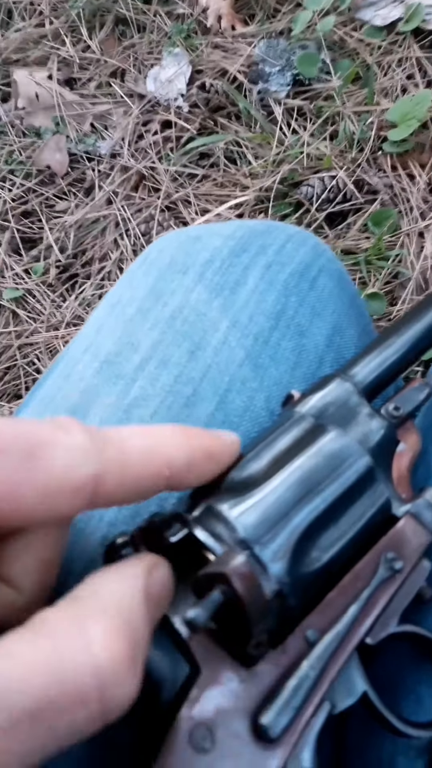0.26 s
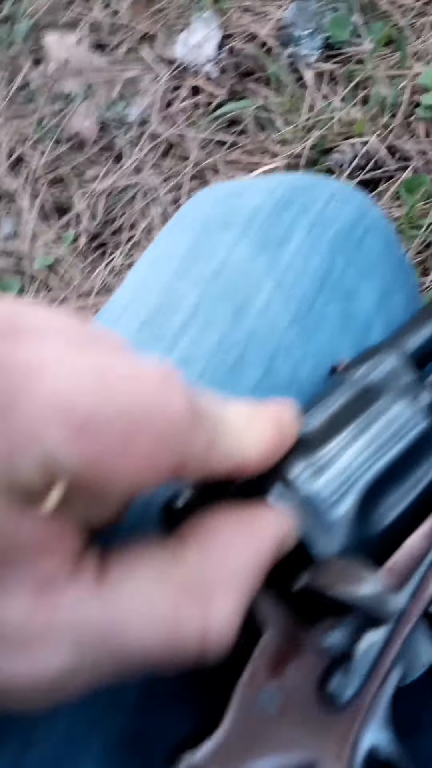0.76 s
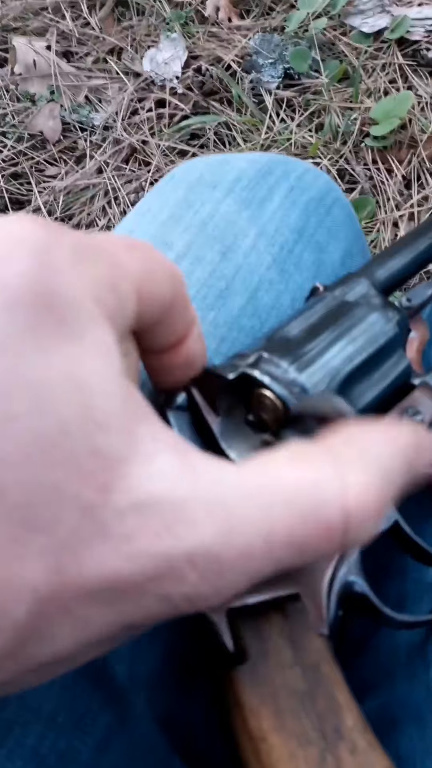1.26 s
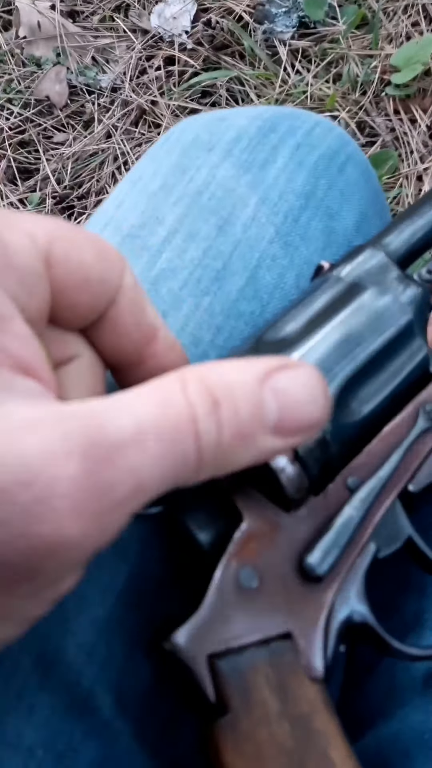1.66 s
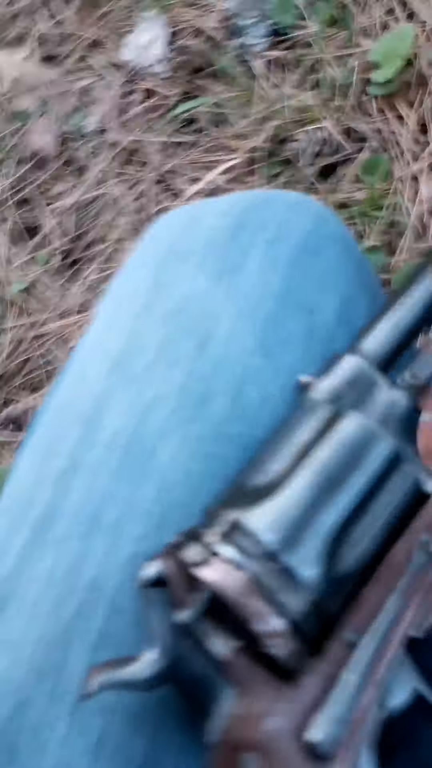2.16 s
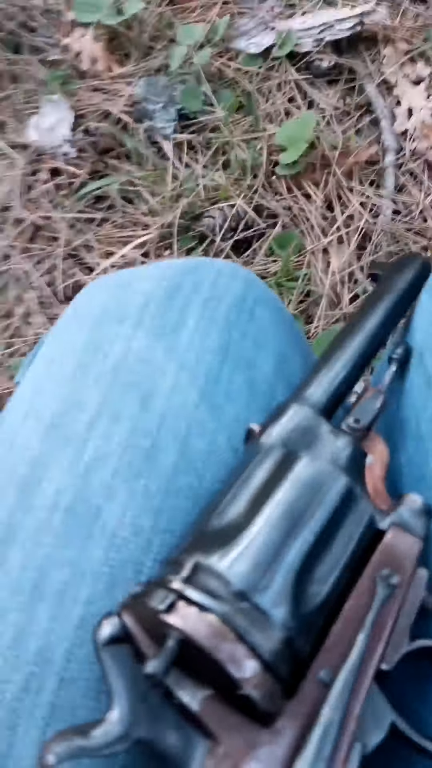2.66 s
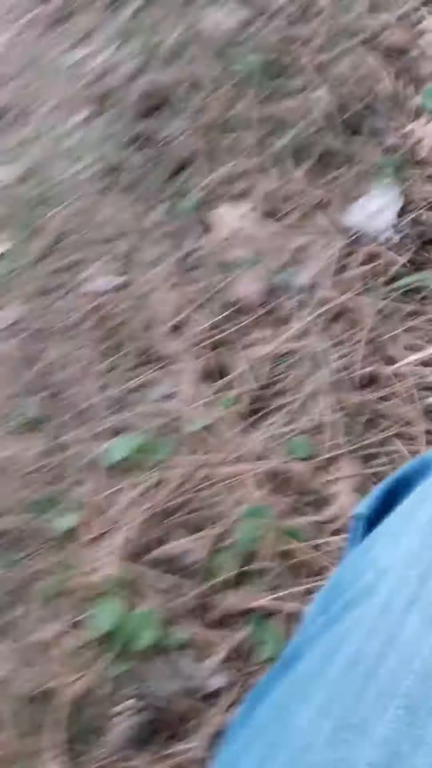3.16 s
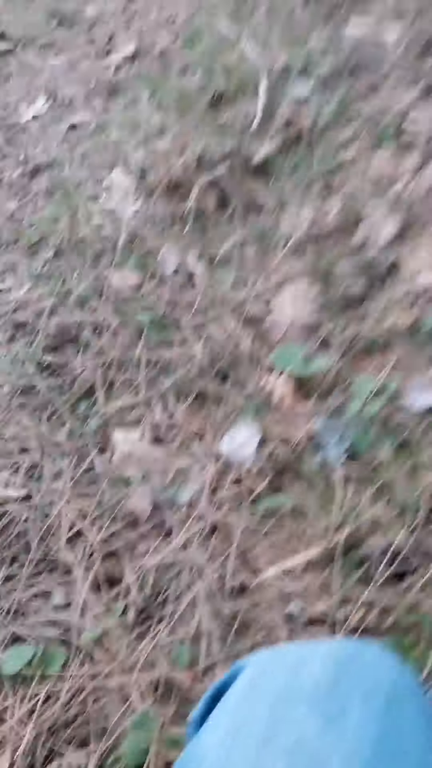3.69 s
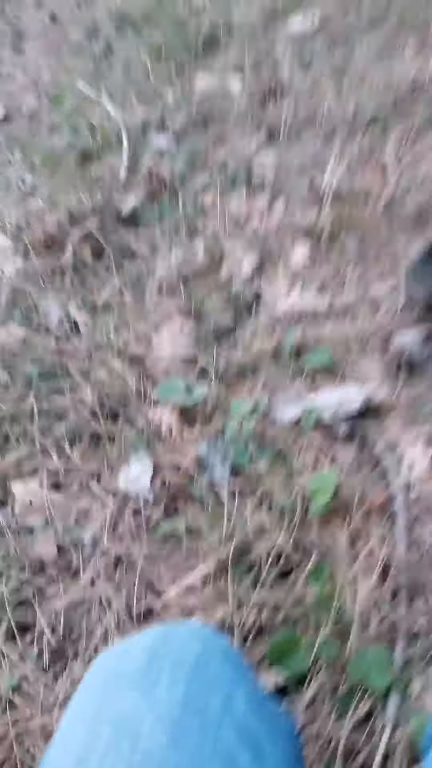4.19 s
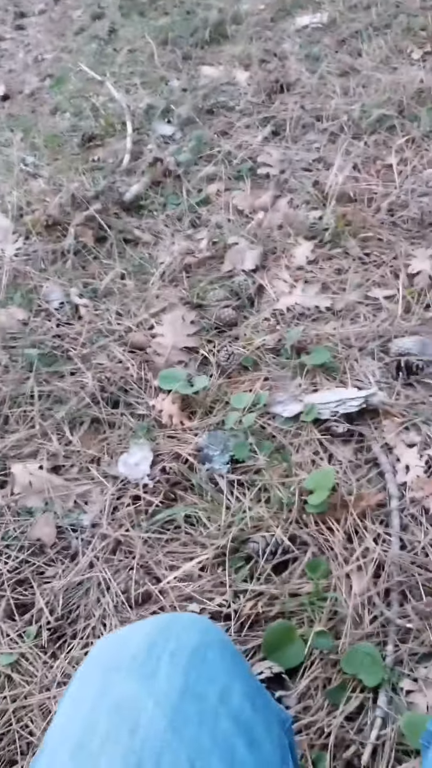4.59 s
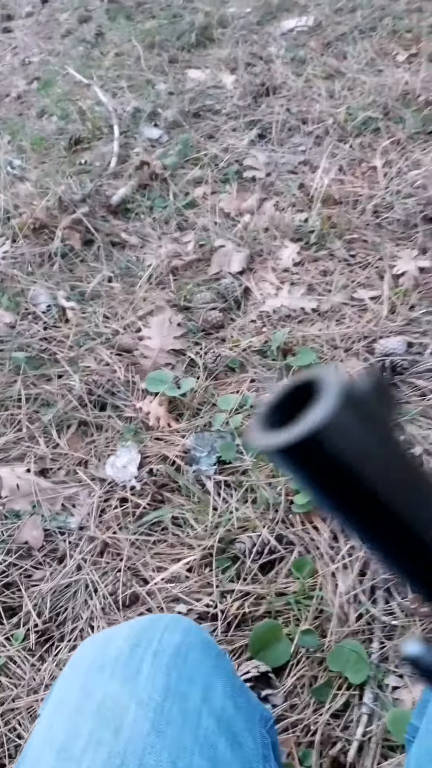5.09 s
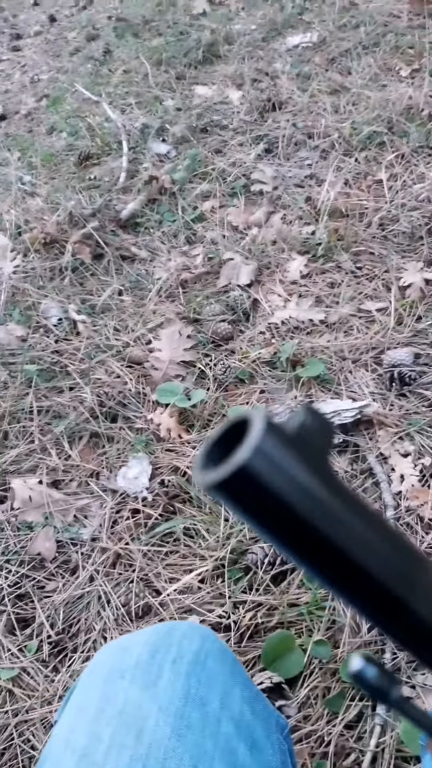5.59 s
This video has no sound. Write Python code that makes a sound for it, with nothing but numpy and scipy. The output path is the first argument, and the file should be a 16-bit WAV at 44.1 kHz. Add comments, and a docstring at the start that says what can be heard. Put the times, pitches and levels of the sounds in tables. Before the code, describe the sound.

Outdoors on a quiet forest floor, fingers rub and knock the camera body with dull scuffs and thumps while a revolver clicks lightly. A hard knock with a click lands near 1.7 seconds. Denim and dry needles rustle midway, then bright steel snaps dominate from about 3.9 seconds, thinning out by the end. Very close stereo handheld microphone, almost no reverberation, faint distant murmur.

```python
"""Old revolver on a quiet forest floor

An old revolver is handled close to a hand-held camera with a left and a right microphone port.
Its steel clicks, rattles and slides are noise and bouncing impacts ringing through resonant modes.
Fingers knock the camera body (short pushes with booming modes) and rub it (clumped friction noise);
denim and dry needles rustle and snap, and a far bird whistles over a low outdoor murmur."""
import sys
import numpy as np
from scipy import signal
from scipy.fft import rfft, irfft
from scipy.io import wavfile
from scipy.ndimage import uniform_filter1d

SR = 44100
rng = np.random.default_rng(int(sys.argv[2]) if len(sys.argv) > 2 else 0)


def dump(signal):
    """Clip the signal to [-1, 1] and save it as 16-bit WAV at the path in sys.argv[1]."""
    limited = np.clip(np.atleast_2d(signal).T, -1, 1)
    pcm = np.round(limited * 32767).astype(np.int16)
    wavfile.write(sys.argv[1], SR, pcm)


N = 257544
TIME = np.arange(N) / SR
# In all tables a positive balance_db leans left; levels are set before panning.


def gain_of(db):
    """Decibels to amplitude."""
    return 10 ** (np.asarray(db) / 20)


def unit_rms(x):
    """Scales to unit rms over all channels together."""
    return x / np.sqrt(np.mean(x ** 2) + 1e-20)


def panned(balance_db):
    """Left and right gains of unit mean power, balance_db apart."""
    pair = gain_of(np.array([balance_db, -balance_db]).reshape(2, -1) / 2)
    return pair / np.sqrt(np.mean(pair ** 2, 0))


def add(mix, start_s, sound):
    """Mixes a stereo sound in at start_s, cut off at the end of the mix."""
    part = mix[:, round(start_s * SR):][:, :sound.shape[1]]
    part += sound[:, :part.shape[1]]


def band(x, edges_hz, kind="bandpass", order=2):
    """Causal Butterworth filter."""
    sections = signal.butter(order, edges_hz, kind, fs=SR, output="sos")
    return signal.sosfilt(sections, x)


def resonance(x, centre_hz, q):
    """One resonant mode driven by x, with unit gain at its centre."""
    b, a = signal.iirpeak(centre_hz, q, fs=SR)
    return signal.lfilter(b, a, x)


def coloured(noise, spectrum):
    """Shapes a full-length noise with a spectrum read on a log-frequency axis, at unit rms."""
    hz = np.fft.rfftfreq(N, 1 / SR)
    point_hz, point_db = np.transpose(spectrum)
    shape_db = np.interp(np.log(hz + 1), np.log(point_hz + 1), point_db)
    return unit_rms(irfft(rfft(noise) * gain_of(shape_db), N))


def wander(rate_hz):
    """Random drift of unit rms, slower than about rate_hz."""
    knots_per_s = 1000
    knots = np.arange(0, 6, 1 / knots_per_s)
    # the filter counts in SR, so the rate is scaled to the sparser knots
    drift = band(rng.standard_normal(len(knots)), rate_hz * SR / knots_per_s, "lowpass")
    return unit_rms(np.interp(TIME, knots, drift))


# Distant outdoor noise at both ports, relative spectrum: (frequency_hz, density_db)
MURMUR_SPECTRUM = [(25, -26), (60, -7), (110, -1.5), (190, -6), (280, -1.5), (400, -10.5), (600, -9),
                   (850, -7), (1050, -13.5), (1450, -26), (2000, -26.5), (2900, -39), (4200, -32.5),
                   (15500, -33.5)]


def murmur(level_db=-62.5, balance_db=-3.5, shared_hz=380):
    """Distant outdoor noise; its bass reaches both ports alike, the rest differs between them."""
    left, right, both = rng.standard_normal((3, N))
    air = band(np.array([left, right]), shared_hz, "highpass") + band(both, shared_hz, "lowpass")
    level = gain_of(level_db + 0.6 * wander(3.1))
    return level * coloured(air, MURMUR_SPECTRUM) * panned(balance_db)


# Light, constant shifting of grip and legs, close to the ports, before the layers' own trims:
# (time_s, rub_db, rustle_db, rub_balance_db)
GRIP_SHIFTS = [(0, -61, -66, -20), (0.3, -61, -78, -10), (0.42, -68, -101, -19), (0.58, -60, -63, 10),
               (0.82, -60, -69.5, -10), (1.1, -48.5, -60, -11), (1.28, -56.5, -73, -8),
               (1.45, -52.5, -64, -13.5), (1.85, -56.5, -65.5, -8.5), (2.15, -58, -62.5, -14),
               (2.55, -59.5, -70, 0.5), (2.7, -54, -60, -5), (3.25, -49.5, -55, -7),
               (3.9, -57.5, -65.5, -4.5), (4.15, -58.5, -66, -9), (4.35, -66, -74, -1),
               (4.82, -61.5, -68, -3), (5.05, -71.5, -87, -4), (5.619, -71.5, -83.5, 2.5),
               (5.84, -66, -74, 3)]
# Strokes of a hand or sleeve: (start_s, hold_s, rub_db, rustle_db, rub_balance_db)
HAND_STROKES = [(0.187, 0.041, -58.5, -72, 5), (0.49, 0.014, -58.5, -68, -5),
                (0.7, 0.025, -53.5, -59.5, -11), (0.894, 0.095, -37, -55, -12),
                (1.171, 0.019, -39.5, -53.5, -10), (1.366, 0.018, -43, -59, -12),
                (1.552, 0.013, -44.5, -59.5, -20), (1.932, 0.071, -49, -64.5, -4.5),
                (2.091, 0.022, -46.5, -56.5, -6), (2.245, 0.041, -55.5, -66, -5),
                (2.814, 0.061, -50, -59, -3), (2.989, 0.0093, -41, -48.5, 9),
                (3.38, 0.048, -50.5, -48.5, -5), (3.512, .025, -60, -55, -15),
                (3.665, 0.052, -55.5, -50, -5.5), (3.713, 0.0097, -46, -47.5, 0.5),
                (3.825, 0.064, -51, -50, 3.5), (3.949, 0.029, -49, -56, -1),
                (4.19, 0.024, -59.5, -60.5, -10.5), (4.458, 0.025, -72, -67.5, -12),
                (4.858, 0.03, -54, -59, -4), (5.19, .045, -61.5, -70.5, 3)]
# Side the denim and needles are heard from as the camera turns: (time_s, balance_db)
RUSTLE_BALANCE = [(0.65, -1), (0.9, -7.5), (1.6, -8.5), (3.25, -10.5), (3.9, -5.5), (5.84, -2.5)]


def movement(rise_db_per_s=291, fall_db_per_s=219.5):
    """Strokes swell, hold and fade over the shifting: left and right gains of rub and of rustle."""
    t = np.linspace(0, N / SR, 3000)
    time_s, *columns = np.transpose(GRIP_SHIFTS)
    rub_db, rustle_db, balance_db = (np.interp(t, time_s, column) for column in columns)
    rub = gain_of(rub_db) * panned(balance_db)
    rustle = gain_of(rustle_db)
    for start_s, hold_s, rub_db, rustle_db, balance_db in HAND_STROKES:
        rise_db = -rise_db_per_s * np.maximum(start_s - t, 0)
        fall_db = -fall_db_per_s * np.maximum(t - start_s - hold_s, 0)
        swell_db = rise_db + fall_db
        # hypot adds powers
        rub = np.hypot(rub, gain_of(rub_db + swell_db) * panned(balance_db))
        rustle = np.hypot(rustle, gain_of(rustle_db + swell_db))
    rustle = rustle * panned(np.interp(t, *np.transpose(RUSTLE_BALANCE)))
    return [np.array([np.interp(TIME, t, port) for port in layer]) for layer in (rub, rustle)]


def grains(rough_db, flutter_db, flutter_hz):
    """Friction: countless slips of uneven size that come in clumps."""
    slips, size = rng.standard_normal((2, 2, N))
    return slips * gain_of(rough_db * size + flutter_db * wander(flutter_hz))


# Skin and cloth on the camera body, before the shell's rasp: (frequency_hz, density_db)
RUB_SPECTRUM = [(24, -35), (40, -2.5), (114, -1.5), (233, -2.5), (312, -0.5), (427, -6.5), (819, -6),
                (1380, -13.5), (2540, -20), (3070, -25.5), (3340, -23), (6000, -40), (7800, -59),
                (13200, -120)]
# Denim and dry needles, relative spectrum: (frequency_hz, density_db)
RUSTLE_SPECTRUM = [(1000, -20), (2000, -1), (3500, -2.5), (5000, -3.5), (7200, -3.5), (9000, -13),
                   (11000, -6), (13000, -4.5), (15500, -6.5), (16500, -27.5)]


def handling(rub, rustle, rustle_trim_db=-0.5, touch_db=-64, firm_db=-48,
             rasp_hz=800, rasp_q=5.9, rasp=0.51):
    """Dull friction on the resonant camera body and the finer rustle of denim and needles."""
    pressure_db = 10 * np.log10(np.mean(rub ** 2, 0))
    touching = 1 / (1 + np.exp(-(pressure_db - touch_db) / 2))  # a light touch barely scrapes
    firm = 1 / (0.5 + np.exp(-(pressure_db - firm_db) / 2))  # a firm one makes the shell rasp
    skin = coloured(grains(5.9, 2.5, 89), RUB_SPECTRUM)
    skin = skin + rasp * firm * resonance(skin, rasp_hz, rasp_q)
    dull = band(skin, 64, "highpass") * rub * touching
    fine = coloured(grains(2.8, 2.1, 49), RUSTLE_SPECTRUM) * gain_of(rustle_trim_db) * rustle
    return dull + fine


def needles(rustle, per_s=170, spread_db=6.5, level_db=-13.0, lowest_hz=1300, highest_hz=7500,
            cycles=2.5, scatter_db=5, pitches=12):
    """Needles and threads catch and snap as the leg moves: decaying ticks, each at one of a few pitches."""
    out, t = np.zeros((2, N)), np.arange(400) / SR
    chance = rng.random(N)
    which = rng.integers(0, pitches, N)
    size = np.minimum(rng.exponential(1, N), 4)
    snaps = (chance < per_s / SR) * gain_of(spread_db * size)
    for k, hz in enumerate(np.geomspace(lowest_hz, highest_hz, pitches)):
        tick = np.sin(2 * np.pi * hz * t) * np.exp(-np.pi * hz * t / cycles)
        side = panned(scatter_db * rng.uniform(-0.92, 1))  # one side per pitch
        out += side * signal.oaconvolve(snaps * (which == k), tick)[:N]
    return unit_rms(out) * rustle * gain_of(level_db)


# Boom of the camera in the hand: (pitch_hz, level_db, t60_s)
BODY_BOOM = [(45.3, -12, 0.066), (72.8, -8, 0.11), (109.4, -1, 0.12), (206.5, 3, 0.023), (269, -9.5, 0.035)]
# Fingertips on the camera body; boom is relative to the push's peak:
# (start_s, push_peak_db, brightness_hz, boom_db, balance_db)
BODY_KNOCKS = [(0.157, -39.5, 92, -7, 6.5), (0.202, -34.5, 1570, -16, -18), (0.58, -34.5, 149, 2.5, 6),
               (0.586, -16.5, 700, -18.5, 34), (0.619, -31.5, 1400, -26, -7), (0.6227, -30, 1400, -30, -5),
               (0.673, -41, 109, -20, 17), (0.772, -40.5, 262, -4.5, 6), (1.166, -31, 860, -35, 2),
               (1.3939, -27, 1630, -26, -4), (1.5698, -28.5, 1350, -35, -11),
               (1.6973, -6, 2560, -7.5, -13.5), (1.782, -28, 1430, -20, -17), (1.822, -14, 1650, -23, -17),
               (1.95, -24.5, 410, -13.5, -12), (1.954, -29, 790, -40, 24), (2.000, -32.5, 545, -14, 16),
               (2.096, -28.5, 607, -26, 24), (2.258, -35.5, 670, -47, 14), (2.286, -27, 770, -27, 25),
               (2.662, -36.5, 690, -15, -11), (2.71, -25.5, 1550, -23, -29), (2.713, -25.5, 790, -27, -12),
               (2.757, -32.5, 835, -29, -21), (3.000, -25, 1200, -25, 23), (3.100, -53.5, 130, 12, -22),
               (3.185, -33, 900, -32, 10), (3.246, -40, 89, -17, -12), (3.9885, -28, 1350, -20, -8),
               (4.075, -42.5, 1000, -15, -19), (4.1323, -34.5, 1410, -28, -6)]


def knocks(contact_cycles=2.54, contact_doubles_db=12, scuff=0.24, scuff_s=0.0038,
           shell_q=8.7, shell=0.31, reach=1.035):
    """A fingertip pushes the shell in and lets go; the spot raps and the whole body booms briefly."""
    out, t = np.zeros((2, N)), np.arange(9000) / SR
    boom = sum(gain_of(db - 60 * t / t60) * np.sin(2 * np.pi * hz * t) for hz, db, t60 in BODY_BOOM)
    for start_s, peak_db, bright_hz, boom_db, balance_db in BODY_KNOCKS:
        # contact time at full scale is in cycles of the rap; a harder push stays longer
        contact_s = contact_cycles / bright_hz * 2 ** (peak_db / contact_doubles_db)
        u = t / contact_s
        press = (u - 1) * np.exp(-u)
        force = press + scuff * rng.standard_normal((2, len(t))) * np.exp(-t / scuff_s)
        force = force + shell * resonance(force, bright_hz, shell_q)
        push = band(force, reach * bright_hz, "lowpass", order=3)
        knock = push / abs(push).max() + gain_of(boom_db) * boom
        add(out, start_s, gain_of(peak_db) * panned(balance_db) * knock)
    return band(out, 51, "highpass", order=3)


# Whistles of a far bird, pitch before its waver:
# (start_s, length_s, start_pitch_hz, end_pitch_hz, level_db)
FAR_WHISTLES = [(0.192, 0.2, 4240, 4240, -86), (4.262, .18, 4230, 4180, -90),
                (5.218, 0.21, 4100, 4310, -84.5), (5.664, 0.18, 4350, 4250, -83.5)]


def bird(waver=0.0063, flutter_db=4.0):
    """Thin, nearly level sine whistles that flutter on their way through the trees."""
    out = np.zeros((2, N))
    for start_s, length_s, start_hz, end_hz, level_db in FAR_WHISTLES:
        count = int(length_s * SR)
        hz = np.linspace(start_hz, end_hz, count) * (1 + waver * wander(55)[:count])
        swell = signal.windows.tukey(count, .6) * gain_of(flutter_db * wander(35)[:count])
        whistle = unit_rms(swell * np.sin(2 * np.pi * np.cumsum(hz) / SR))
        add(out, start_s, gain_of(level_db) * panned(-2.2) * whistle)
    return out


# Ring of the cylinder and frame, pitch before the grip shifts it: (pitch_hz, width_hz, level_db)
STEEL_MODES = [(900, 350, -9), (2157, 140, -6), (3210, 530, -3.5), (4220, 750, -1.5), (5020, 170, -6),
               (6320, 850, -1.5), (6720, 420, 2), (7170, 540, -8.5), (9600, 930, -10.5), (10040, 390, -7),
               (11380, 520, -4), (12470, 480, -3), (14070, 550, -4), (15640, 600, -9.5)]


def steel(force, grip, direct):
    """The gun's modes, damped by the hand; the grip scales their pitch, and some force is heard direct."""
    out = direct * force
    for pitch_hz, width_hz, level_db in STEEL_MODES:
        centre_hz = pitch_hz * grip
        out = out + gain_of(level_db) * resonance(force, centre_hz, centre_hz / width_hz)
    return out


def loudest(x):
    """Rms of the strongest two milliseconds of each channel."""
    return np.sqrt(uniform_filter1d(x ** 2, size=88, axis=-1).max(-1, keepdims=True) + 1e-20)


# Close steel clicks; brightness tilts the bands around level_db:
# (start_s, level_db, brightness_db, balance_db, rattle_s)
STEEL_CLICKS = [(0.504, -50.5, -3.5, 7, 0.016), (0.795, -57.5, -7.5, 5, 0.0041),
                (1.1885, -44.5, -6.5, -26, 0.003), (1.3909, -33, 7, 8, 0.0021),
                (1.3932, -26, -8.5, 1, 0.0045), (1.698, -26, 0.5, -5, .0016),
                (1.821, -49, -2.5, -5, 0.0007), (2.098, -50, -2, -7, .009), (3.002, -37, -6, -23, 0.0062),
                (3.26, -56, -12, -5, 0.0042), (3.348, -55, -15.5, -8, 0.0069),
                (3.4494, -37, -5, -10, 0.004), (3.505, -40.5, 1, -16, 0.0099),
                (3.7336, -43.5, -10.5, -10, 0.0093), (3.7672, -30.5, 0.5, -3.5, 0.0084),
                (3.875, -45, -4, 1, 0.003), (3.879, -15.5, 5.5, -3.5, 0.0057),
                (3.8863, -27.5, 4, -6, .0022), (3.89, -34.5, 8.5, -1, .002), (3.92, -40, 4, -2, .0027),
                (3.944, -21.5, 0, -4, 0.0041), (3.9845, -42, -2.5, -8, 0.0062),
                (4.1314, -51, -6.5, -15, 0.0028), (4.143, -52.5, -1, 4, 0.0047),
                (4.1942, -27.5, 6, -6, 0.0041), (4.1998, -31.5, -3, -3, .004),
                (4.577, -48, 0.5, -2, 0.0062), (4.6, -44, 4, -9, .002), (4.608, -52, 1, -2, .0016),
                (4.749, -20.5, 3, -1.5, 0.0069), (4.752, -30, 0, -23, .002), (4.85, -29, 6.5, -5, 0.0029),
                (4.8665, -44.5, 1, 0, .005), (4.892, -59, -2, 10.5, .004),
                (5.0384, -70.5, 3.5, -4.5, 0.0019), (5.165, -24.5, 4, -3, 0.0074),
                (5.339, -69.5, -6.5, -5, .003), (5.544, -47.5, 5.5, -5, 0.0021),
                (5.549, -47.5, 8.5, -11, .0024)]


def clicks(bounce=0.65, bounce_s=.0016, count=5, grit=0.22, snap_s=0.00063, rattle_db=-13,
           onset_db=-24, onset_s=0.0051, body_db=-2.5, snap_db=-1.0, free_rattle_s=.0045,
           ring_from_db=-42, ring_db_per_db=0.34):
    """A part snaps home, bounces and settles; each port hears its own mix of modes."""
    before_s = .006  # short faint onset before the snap
    out, t = np.zeros((2, N)), np.arange(1800) / SR - before_s
    onset = gain_of(onset_db) * np.exp(-(t / onset_s) ** 2)
    snap = np.exp(-(t / snap_s) ** 2)
    for start_s, level_db, bright_db, balance_db, rattle_s in STEEL_CLICKS:
        # a part that stops sooner is held: it hops and rings less
        free = min(rattle_s / free_rattle_s, 1)
        settling = gain_of(rattle_db) * np.exp(-(t / rattle_s) ** 2)
        contact = onset + (snap + settling) * (t > 0)
        force = grit * rng.standard_normal((2, len(t))) * contact
        # each hop is shorter and weaker
        shrink = np.linspace(1, .5, count)
        gaps = bounce_s * np.sqrt(free) * rng.uniform(0.55, 1, (2, count)) * shrink
        for port, hops in zip(force, np.cumsum(gaps, 1) - gaps):
            port[np.searchsorted(t[:-1], hops + snap_s / 2)] += (-bounce) ** np.arange(count)
        ring = steel(force, grip=1 + .02 * rng.uniform(-1, 1), direct=0.038)
        # the harder a part snaps home, the more the middle modes stand out
        flanks_db = -ring_db_per_db * free * max(level_db - ring_from_db, 0)
        # parts that meet squarely tip the balance from the low modes to the high ones
        bands = [(body_db + flanks_db - bright_db, [900, 4100]),
                 (snap_db, [5000, 8600]),
                 (flanks_db + bright_db, [9600, 16000])]
        for trim_db, edges_hz in bands:
            part = band(ring, edges_hz, order=3)
            level = gain_of(level_db + trim_db) * panned(balance_db)
            add(out, start_s - before_s, level * part / loudest(part))
    return out


# Close steel sliding on steel, level before its fade: (start_s, level_db, length_s, balance_db)
STEEL_SLIDES = [(1.187, -50, 0.021, -8), (1.389, -37.5, 0.032, 0), (2.996, -42, 0.017, 2),
                (3.728, -52.5, 0.016, 7), (3.882, -34.5, 0.0086, -8.5), (4.202, -48.5, 0.026, -1),
                (4.593, -46, 0.006, -2), (4.747, -40, 0.013, -2), (4.846, -38.5, 0.0034, -6),
                (5.533, -57, 0.038, -3)]


def slides(grit_db=-0.5):
    """Tiny catches follow each other while a part is dragged along the frame: noise through its modes."""
    out = np.zeros((2, N))
    for start_s, level_db, length_s, balance_db in STEEL_SLIDES:
        count = int(length_s * SR)
        force, size = rng.standard_normal((2, 2, count))
        ring = steel(force * gain_of(grit_db * size), grip=0.79, direct=0.29)
        scrape = unit_rms(band(ring, 600, "highpass"))
        fade = signal.windows.tukey(count, .4) * np.linspace(1.3, .6, count)
        add(out, start_s, gain_of(level_db) * panned(balance_db) * scrape * fade)
    return out


def shaded(x, left_db=-8.5, above_hz=9000):
    """The left port faces away from the gun and loses some of the top."""
    hz = np.fft.rfftfreq(N, 1 / SR)
    shade = gain_of(left_db / (1 + (above_hz / (hz + 1)) ** 8))
    return np.array([irfft(rfft(x[0]) * shade, N), x[1]])


def forest(x, t60=.3, wet_db=-35):
    """Ground and trunks scatter back a faint, short tail: decaying noise that starts after 5 ms."""
    t = np.arange(SR // 2) / SR
    scatter = band(rng.standard_normal((2, len(t))), 7000, "lowpass", order=1)
    tail = scatter * gain_of(-60 * t / t60) * (t > .005)
    tail = tail / np.linalg.norm(tail[0])
    return x + gain_of(wet_db) * signal.fftconvolve(x, tail, axes=1)[:, :N]


def scene():
    """The wood, the hands on the camera and the gun close by; only the gun gets the forest's tail."""
    rub, rustle = movement()
    hands = handling(rub, rustle) + needles(rustle) + knocks()
    gun = forest(shaded(clicks() + slides()))
    return murmur() + hands + bird() + gun


def record(dry, edge_hz=16100):
    """The recorder's band limit: a steep linear-phase lowpass."""
    lowpass = signal.firwin(401, edge_hz, window=("kaiser", 9), fs=SR)
    return signal.oaconvolve(dry, lowpass[None], "same")


dry = scene()
out = record(dry)
dump(out)
```